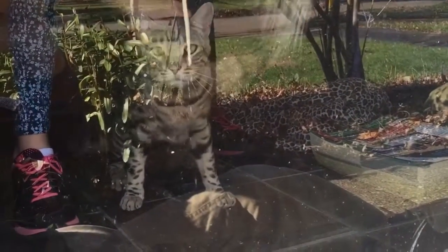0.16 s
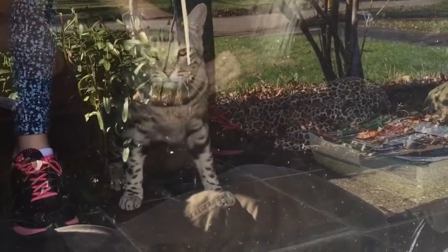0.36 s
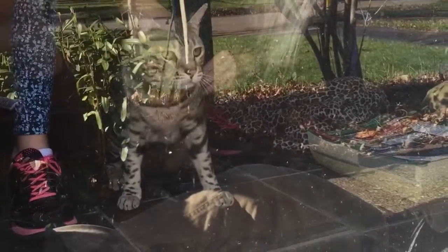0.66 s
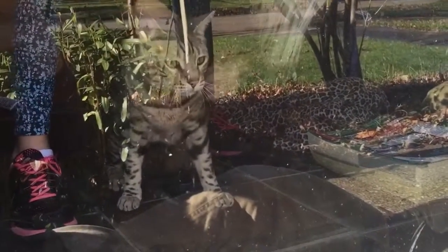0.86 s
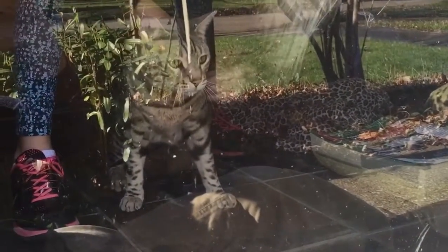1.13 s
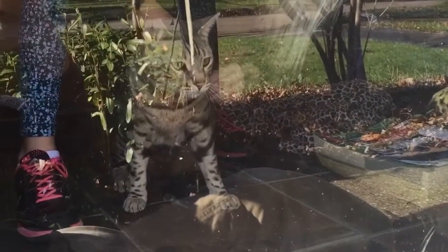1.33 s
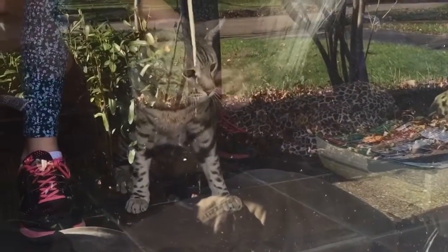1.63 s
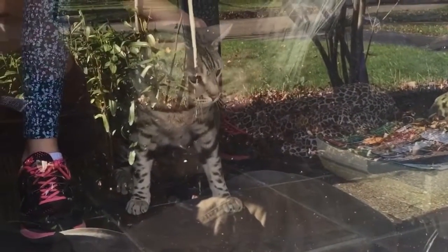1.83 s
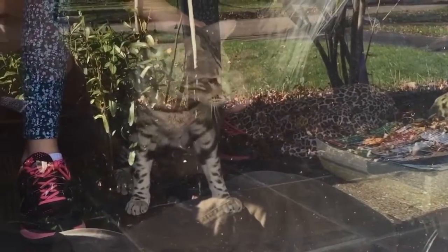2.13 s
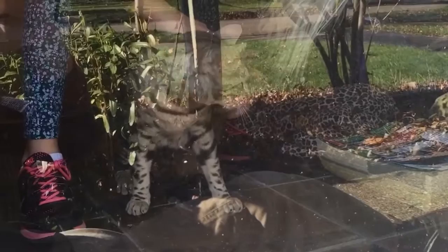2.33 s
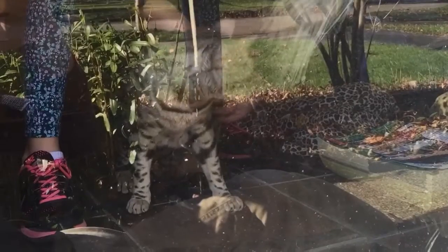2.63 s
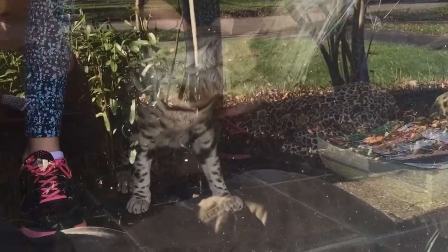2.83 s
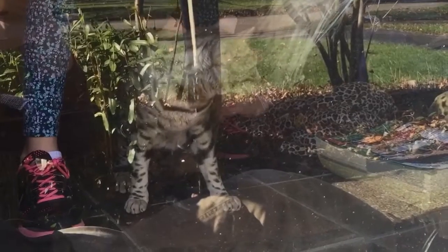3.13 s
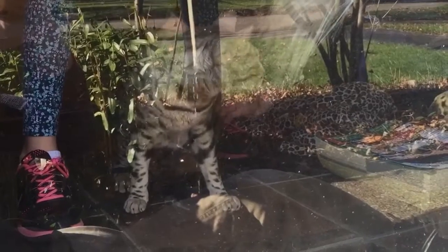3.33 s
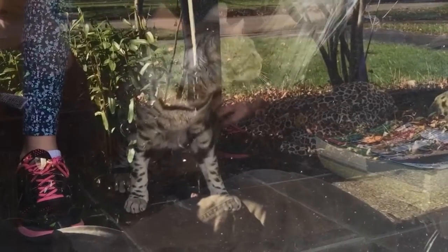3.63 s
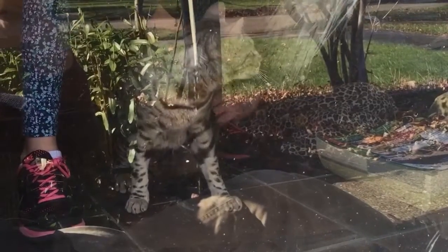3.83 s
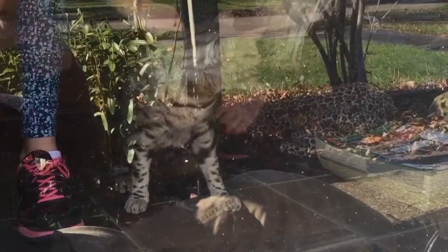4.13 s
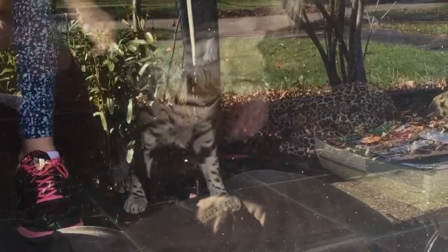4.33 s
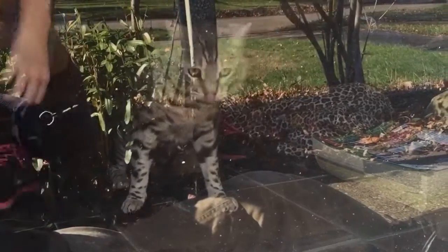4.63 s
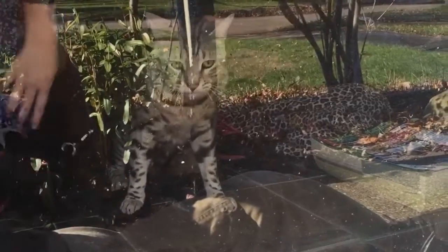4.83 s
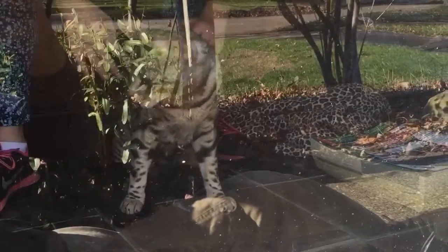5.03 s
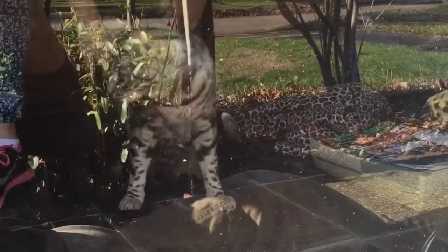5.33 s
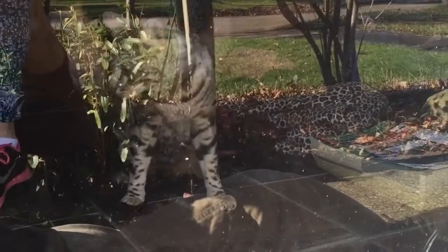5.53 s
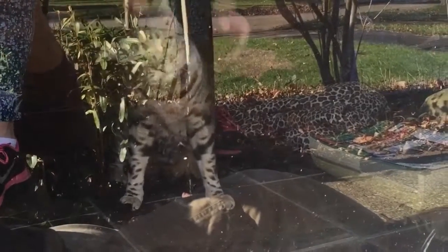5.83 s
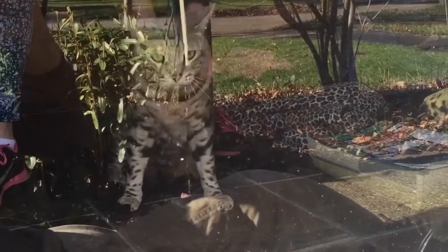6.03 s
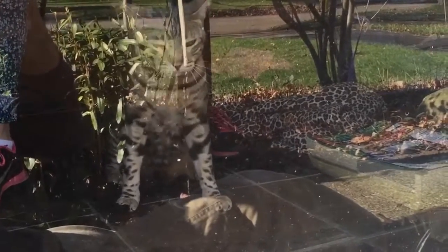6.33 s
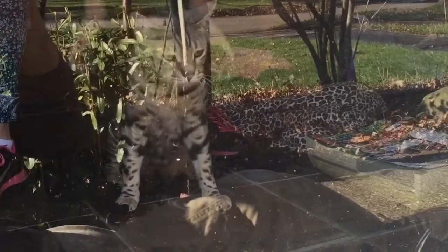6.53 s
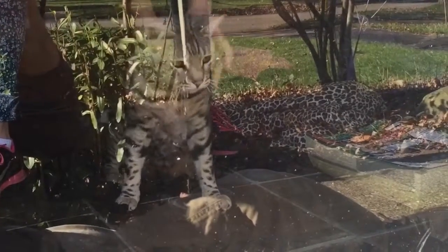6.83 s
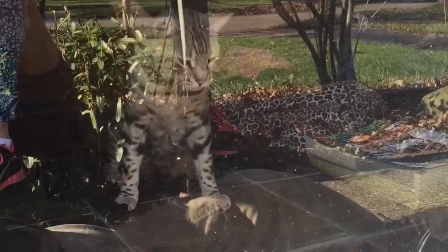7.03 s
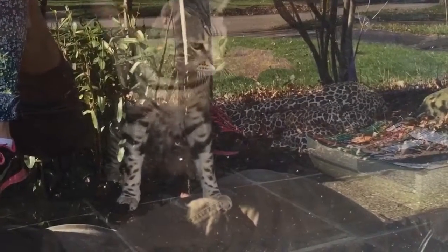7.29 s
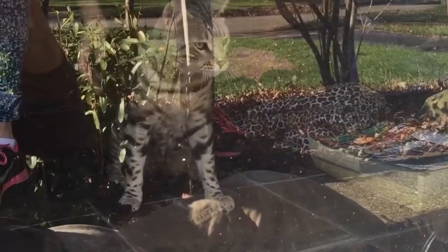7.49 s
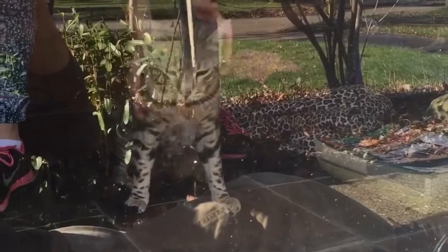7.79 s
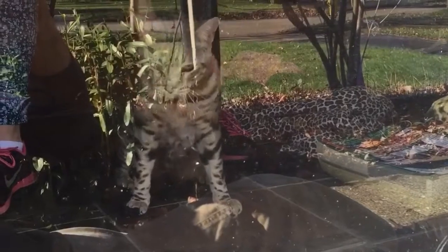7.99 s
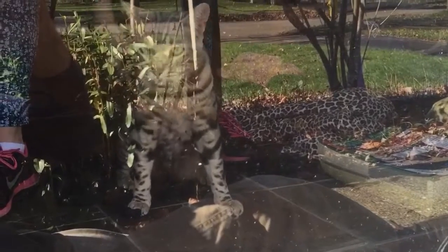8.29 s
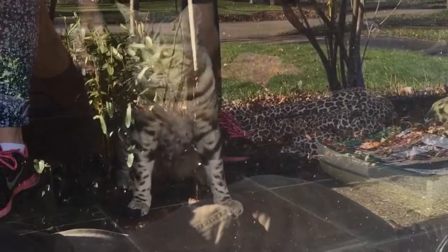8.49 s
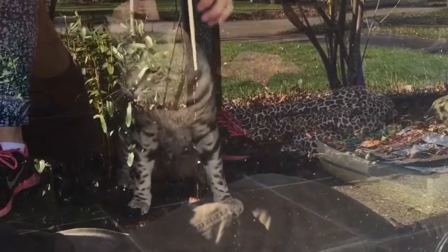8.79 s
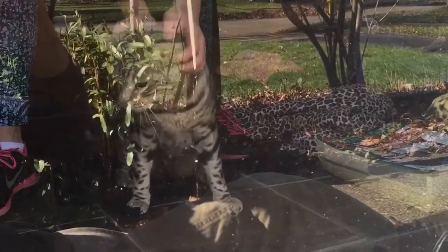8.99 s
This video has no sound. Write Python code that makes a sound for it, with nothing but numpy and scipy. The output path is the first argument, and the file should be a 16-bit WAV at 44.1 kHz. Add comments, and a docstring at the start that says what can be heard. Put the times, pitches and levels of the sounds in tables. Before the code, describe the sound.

A small engine drones in the distance under chattering songbirds, then a door latch clicks, thumps and rattles in a metal frame before calm returns.

```python
"""One microphone at a sliding glass door, facing a garden. From the start a small engine drones some way off,
as tones at multiples of its cycle rate; songbirds chatter in gliding whistles over a faint wash of shaped noise.
After about 3 s come soft rustles of grainy noise close by, then light ticks of the latch at 4.4 s. From 5.5 s
dull noise thumps push the door panel and the latch clacks and rattles, noise bursts ringing the metal frame.
A little more rustling follows, while engine and birds go on."""
import sys
import numpy as np
from scipy import signal
from scipy.fft import rfft, irfft, next_fast_len
from scipy.io import wavfile

SR = 44100
rng = np.random.default_rng(int(sys.argv[2]) if len(sys.argv) > 2 else 0)


def transcribe(signal):
    """Save signal, clipped to [-1, 1], as a 16-bit WAV file at the path in sys.argv[1]."""
    frames = np.atleast_2d(signal).T
    limited = np.clip(frames, -1, 1)
    pcm = np.round(limited * 32767).astype(np.int16)
    wavfile.write(sys.argv[1], SR, pcm)


N = 403515
T = np.arange(N) / SR  # time axis, s


def amp(db):
    """Decibels to gain."""
    return 10 ** (np.asarray(db) / 20)


def unit(x):
    """Scale to rms 1."""
    return x / np.sqrt(np.mean(x ** 2) + 1e-20)


def curves(table):
    """Each column of a table, joined by straight lines in time."""
    s, *columns = np.transpose(table)
    return [np.interp(T, s, column) for column in columns]


def add(out, s, x):
    """Mix x into out from time s on."""
    i = max(int(s * SR), 0)
    out[i:i + len(x)] += x[:max(N - i, 0)]


def colour(x, points):
    """Shape a sound with a (Hz, dB) spectrum that falls away beyond its end points."""
    hz, db = np.transpose(points)
    size = next_fast_len(len(x))
    f = np.fft.rfftfreq(size, 1 / SR) + 1  # 1 Hz up, to keep the logarithm finite
    gain = amp(np.interp(np.log(f), np.log(hz), db))
    gain = gain * np.minimum(f / hz[0], 1) ** 2 * np.minimum(hz[-1] / f, 1) ** 2
    return irfft(rfft(x, size) * gain, size)[:len(x)]


def noise(points, size=N):
    """Noise of a given spectrum, rms 1."""
    return unit(colour(rng.standard_normal(size), points))


def band(x, lo_hz, hi_hz):
    """Band-pass."""
    sos = signal.butter(2, [lo_hz, min(hi_hz, SR / 2 - 1)], "band", fs=SR, output="sos")
    return signal.sosfilt(sos, x)


def walk(rate, size=N):
    """Random values of spread about 1, drawn rate times a second and joined by straight lines."""
    at = np.arange(size) * rate / SR
    count = int(at[-1]) + 2
    # the root makes up for the spread lost between the points
    return np.interp(at, np.arange(count), rng.standard_normal(count)) * np.sqrt(3 / 2)


def fade(t, t60):
    """Exponential decay that loses 60 dB in t60 seconds."""
    return np.exp(-np.log(1000) * t / t60)


def echoes(x, t60, wet_db, top_hz):
    """Diffuse reflections of walls and paving: a decaying noise tail added to the direct sound."""
    t = T[:SR]
    tail = band(rng.standard_normal(SR), 160, top_hz) * fade(t, t60) * (1 - np.exp(-t / 0.001))
    return x + amp(wet_db) * signal.fftconvolve(x, tail / np.sqrt(np.sum(tail ** 2)))[:N]


def doorway(x, ripple_db=-15):
    """Close reflections between glass, floor and wall put a fixed ripple on the spectrum."""
    t = T[:SR // 20]
    early = band(rng.standard_normal(len(t)), 620, 6100) * fade(t, 0.034) * (t > .002)
    return x + amp(ripple_db) * signal.fftconvolve(x, early / np.sqrt(np.sum(early ** 2)))[:N]


# spectra of the low rumble, road drone, tyres and thin hiss: [freq_hz, relative density_db per Hz]
RUMBLE_SPECTRUM = [(20, -16.5), (35, -19.5), (48, -1), (70, 3.5), (110, 1), (170, -3), (260, -15),
                   (400, -25), (800, -44)]
DRONE_SPECTRUM = [(240, -3), (350, 2), (480, -5.5), (620, -7), (900, -12.5)]
TYRE_SPECTRUM = [(400, -9.5), (620, -6.5), (780, -1.5), (980, 3.5), (1130, 3), (1330, 2.5), (1550, -0.5),
                 (1950, -2.5), (2400, -6), (3500, -15), (5000, -25), (7500, -33)]
HISS_SPECTRUM = [(2000, 10.5), (4000, 3.5), (6200, 5.5), (7500, -1.5), (9500, -2), (10400, -8), (11500, -5),
                 (15000, -8)]
# low outdoor rumble: [time_s, level_db]
RUMBLE_LEVEL = [(0, -45.5), (.8, -44.5), (1.7, -47.5), (2.05, -44), (2.7, -46), (5.2, -45.5), (6.3, -48),
                (7.1, -45), (9.15, -45.5)]
# far road, before a small lift of both: [time_s, drone_db, tyres_db]
ROAD_LEVEL = [(0.0, -62.5, -57.5), (2.06, -59.5, -58), (3.74, -63.5, -60), (6.04, -62, -61.5),
              (6.52, -64, -61), (9.15, -62.5, -58)]


def outdoors():
    """Low rumble, the drone and tyres of a far road and a thin steady hiss, all shaped noise."""
    (rumble_db,) = curves(RUMBLE_LEVEL)
    drone_db, tyres_db = curves(ROAD_LEVEL)
    rumble = noise(RUMBLE_SPECTRUM) * amp(rumble_db + 1.36 * walk(9))
    drone = noise(DRONE_SPECTRUM) * amp(drone_db + 2.0 + 1.6 * walk(14))
    tyres = noise(TYRE_SPECTRUM) * amp(tyres_db + 0.62 + 1.2 * walk(11))
    hiss = amp(-74.5) * noise(HISS_SPECTRUM)
    return rumble + drone + doorway(tyres + hiss)


# orders are multiples of the cycle rate; levels are rms
# engine some way off: [time_s, cycle_rate_hz, firing_tone_db (order 4), throb_db (reference for its neighbours)]
ENGINE = [(0.0, 24.4, -38.5, -46), (0.74, 24.83, -37.5, -43), (0.89, 24.05, -37, -42),
          (1.07, 24.87, -39.5, -44), (1.53, 24.5, -43, -48), (1.63, 24.56, -62, -67),
          (2.11, 25.03, -44, -47), (3.08, 25.75, -39, -46), (4.13, 25.19, -39, -50.5),
          (4.28, 25.14, -41.5, -73), (4.94, 24.78, -39, -52), (6.45, 24.48, -40, -54.5),
          (7.77, 24.78, -42, -43), (8.95, 25.37, -58, -49.5), (9.15, 24.71, -51, -46)]
# first and second overtones of the firing tone, orders 8 and 12: [time_s, level_db]
OCTAVE_LEVEL = [(0.0, -81), (0.07, -57), (1.12, -47), (1.22, -60.5), (1.4, -44.5), (1.81, -57.5),
                (2.6, -46), (2.73, -61.5), (4.05, -47.5), (4.89, -55), (5.99, -53), (6.04, -64),
                (7.01, -57), (7.16, -80), (7.34, -51), (7.98, -62.5), (8.23, -50.5), (9.15, -64)]
TWELFTH_LEVEL = [(0.0, -59.5), (0.25, -65), (0.36, -56.5), (0.92, -62.5), (2.01, -55), (2.73, -76),
                 (3.9, -71), (4.08, -58), (7.24, -61.5), (9.15, -76)]
# lines that rise and fall with the throb: [order, level_db re throb_db]
THROB_ORDERS = [(3, -13), (5, -0.5), (6, -13)]
# weak lines of steady mean level: [order, level_db]
SIDE_ORDERS = [(6, -61.5), (7, -78.5), (9, -64.5), (10, -72.5), (13, -77), (16, -72.5), (20, -75.5)]


def engine():
    """Four unequal firings a cycle: a strong firing tone with neighbours that make it throb at the cycle rate."""
    cycle_hz, firing_db, throb_db = curves(ENGINE)
    (octave_db,), (twelfth_db,) = curves(OCTAVE_LEVEL), curves(TWELFTH_LEVEL)
    unsteady_hz = cycle_hz * (1 + 0.00354 * walk(14))
    angle = 2 * np.pi * np.cumsum(unsteady_hz) / SR
    lines = [(4, firing_db), (8, octave_db), (12, twelfth_db)]
    lines += [(order, throb_db + db) for order, db in THROB_ORDERS]
    lines += [(order, db + 1.4 * walk(3)) for order, db in SIDE_ORDERS]
    out = np.zeros(N)
    for order, db in lines:
        # the air on the way makes each line waver a little in level and phase
        out += amp(db + 0.8 * walk(12)) * np.cos(order * angle + 0.3 * walk(5))
    return np.sqrt(2) * out


RASP_OCT, RASP_HZ = 0.0993, 602  # pitch flutter of a fully raspy note, and its changes a second
BROKEN_DB, BROKEN_RATE = 3, 155  # unevenness of a note's loudness, and its changes a second
PARTNER_OCT, PARTNER_DB = .16, -14  # a fainter partner tone a little above each note: its pitch offset in octaves and level


def whistle(length, mid_hz, glide_oct, db, swing_oct=0, swings=1, rasp=0.678):
    """One gliding, warbling note with a fainter partner tone a little above it; rasp makes the pitch flutter,
    and each tone breaks up on its own."""
    size = int(max(length, .01) * SR)
    along = np.linspace(-1, 1, size)
    glide = glide_oct / 2 * along
    swing = swing_oct * np.cos(np.pi * swings * along)
    flutter = RASP_OCT * rasp * walk(RASP_HZ, size)
    angle = 2 * np.pi * np.cumsum(mid_hz * 2 ** (glide + swing + flutter)) / SR

    def voice(ratio):
        """One tone of the note, with its own uneven loudness."""
        return unit(amp(BROKEN_DB * walk(BROKEN_RATE, size))) * np.sin(ratio * angle)

    both = voice(1) + amp(PARTNER_DB) * voice(2 ** PARTNER_OCT)
    return amp(db) * signal.windows.tukey(size, .4) * both


TWITTER_HZ, TWITTER_SPREAD_OCT = 3635, 0.42  # centre pitch of the flock, and spread to either side
TWITTER_S = .06  # mean length of a note, s
TWITTER_GLIDE_OCT, TWITTER_GLIDE_SPREAD_OCT = -0.202, 0.219
TWITTER_DB_PER_OCT, TWITTER_SCATTER_DB = -14, 1  # high notes are weaker; every note has its own strength


def twitter(s, within_s, db, count):
    """Short faint notes of other birds, scattered round time s."""
    out = np.zeros(N)
    for late, pitch, long, glide, loud in rng.uniform(-1, 1, (count, 5)):
        octaves = TWITTER_SPREAD_OCT * pitch
        length = TWITTER_S * (1 + long / 2)
        glide_oct = TWITTER_GLIDE_OCT + TWITTER_GLIDE_SPREAD_OCT * glide
        note_db = db + TWITTER_DB_PER_OCT * octaves + TWITTER_SCATTER_DB * loud
        note = whistle(length, TWITTER_HZ * 2 ** octaves, glide_oct, note_db)
        add(out, s + within_s * late - length / 2, note)
    return out


STRAY_DB = -70.5  # flock notes at any time, at the centre pitch
ANSWER_DB, ANSWER_WITHIN_S = -70, .08  # flock notes that crowd round a clear one
# clear bird notes, most of them falling; the swing is a crest (+) or dip (-) in mid-note:
# [start_s, length_s, middle_pitch_hz, glide_octaves, swing_octaves, swing_count, rasp (0-1), level_db]
NOTES = [(0, .099, 3860, -.22, .02, 1, .1, -70), (.6, .08, 3600, -1, -0.037, 1, .2, -59.5),
         (.742, 0.029, 3450, 0.21, 0, 1, 0.45, -56.5), (0.955, .029, 4330, 0.011, .02, 1, 0.24, -64),
         (1.168, .09, 3490, .3, 0.012, 1, 0.18, -54.5), (1.238, 0.033, 3600, -.35, 0, 1, .2, -59.5),
         (1.385, 0.031, 3340, 0, .06, 1, .15, -56), (1.652, 0.044, 5600, -.2, 0, 1, .6, -67.5),
         (1.713, 0.048, 4200, -.3, .02, 1, 0.73, -58.5), (1.939, .03, 4400, -.05, 0, 1, .5, -63.5),
         (2.169, 0.041, 5444, .08, 0, 1, 0.23, -63), (2.326, .033, 4150, -0.2, 0, 1, .3, -66),
         (2.67, .12, 4520, -.08, .02, 2.5, 0.1, -65), (2.701, 0.099, 3460, -0.0057, .09, 2.3, 0.2, -55),
         (2.791, .029, 2750, .2, 0, 1, .4, -54), (2.82, .1, 3490, 0.054, .08, 1, .7, -58.5),
         (2.958, 0.041, 3760, -.34, .05, 1, 0.35, -63), (3.04, 0.029, 3200, -.1, .04, 1, 0.26, -59),
         (3.115, 0.089, 3230, 0.061, -.056, 1.3, 0.2, -53), (3.39, .03, 2903, -0.46, 0, 1, .7, -63),
         (3.484, 0.073, 5050, -0.37, 0.0062, 1, .3, -69), (3.66, .13, 3260, -.31, .06, 3, 0.63, -57.5),
         (3.79, .037, 5500, 0.12, 0, 1, .9, -65), (3.998, .06, 3352, -.55, 0.013, 1, .26, -59),
         (4.025, .075, 5080, -0.12, 0.0038, 1, 0.24, -65), (4.088, .066, 4100, -0.92, .05, 1, .25, -54.5),
         (4.239, 0.083, 3314, 0.017, -.06, 1.4, 0.17, -57), (4.249, 0.022, 5670, 0.19, 0, 1, .2, -61),
         (4.31, .053, 3200, -.1, .05, 2, .3, -62), (4.312, 0.03, 5600, 0.044, 0, 1, .4, -65),
         (4.535, .047, 2690, -.26, .06, 2, .7, -61), (4.575, 0.033, 4380, -.05, .02, 1, .2, -62),
         (4.61, 0.071, 3480, 0, -.07, 1, 0.3, -57), (4.673, .025, 2840, -0.25, 0, 1, 0.27, -57),
         (4.783, .07, 4000, -0.41, -0.016, 2, .35, -57), (4.848, 0.038, 6450, 0, 0.036, 2, .4, -61.5),
         (4.858, 0.039, 3080, -.08, 0.037, 1, 0.34, -54), (4.937, .028, 3750, -.35, 0, 1, .4, -59),
         (4.969, 0.047, 4170, 0, -.02, 1, .4, -58), (5.005, 0.043, 2980, -.45, 0, 1, 0.63, -54.5),
         (5.09, .065, 3310, -0.25, 0.0036, 1, .7, -61.5), (5.59, .039, 4650, -0.16, 0.0057, 1, .37, -62.5),
         (5.634, .055, 3550, -.2, 0.019, 1, 0.35, -59.5), (5.8, 0.033, 5300, .25, 0, 1, .3, -63),
         (6.083, 0.085, 6350, .06, .01, 2, .25, -66.5), (6.11, 0.073, 3270, -.03, 0.023, 2, 0, -63),
         (6.177, .069, 4565, -.5, -.017, 1, 0.42, -63), (6.249, 0.046, 4100, -0.25, 0, 1, .6, -59.5),
         (6.55, 0.094, 3250, 0.56, -0.025, 1, 0.56, -58), (6.78, .035, 4050, 0.11, 0, 1, .2, -64),
         (6.8, 0.048, 3200, 0, -.02, 1, .2, -65), (6.975, .085, 3300, -0.61, -.02, 2, 0.38, -64),
         (7.041, 0.028, 5500, -0.092, 0, 1, .2, -70), (7.265, 0.048, 4445, -0.091, .035, 1, .15, -56.5),
         (7.4, 0.089, 3646, -.5, -.055, 2, .8, -61.5), (7.495, .11, 3777, -0.75, .03, 3, 0.35, -60.5),
         (7.631, 0.029, 2520, -0.19, 0, 1, .3, -62), (7.657, 0.024, 3980, -.25, 0, 1, .3, -62),
         (7.775, 0.054, 3853, -0.022, -0.015, 1, 0.23, -56.5), (7.822, .05, 5500, .03, 0, 1, .3, -66.5),
         (7.845, 0.057, 3250, -0.78, -.06, 1, 0.5, -57), (7.914, .05, 3000, -.05, 0.034, 1, 0.1, -51.5),
         (8.175, .03, 4550, -.1, 0.038, 1, .3, -68), (8.327, 0.094, 3900, 0.06, 0.078, 1, .5, -63),
         (8.41, .045, 3220, -0.43, .02, 1, .45, -53), (8.555, .07, 4150, -.45, 0, 1, .3, -66.5),
         (8.66, 0.099, 2880, .03, 0.051, 1, .12, -55.5), (8.713, .12, 3990, -.3, .06, 3, .5, -64),
         (9.098, .025, 4650, -.1, 0, 1, 0.29, -65), (9.104, .05, 3100, 0.087, 0, 1, 0.2, -61)]


def birds():
    """Clear notes with flock notes crowding round each, and stray calls, blurred by the garden's reflections."""
    out = twitter(T[-1] / 2, T[-1] / 2, STRAY_DB, count=130)
    for s, length, hz, glide_oct, swing_oct, swings, rasp, db in NOTES:
        add(out, s, whistle(length, hz, glide_oct, db, swing_oct, swings, rasp))
        out += twitter(s + length / 2, ANSWER_WITHIN_S, ANSWER_DB, count=2)
    return echoes(out, t60=.2, wet_db=-10, top_hz=9000)


RUSTLE_GRAIN_DB, RUSTLE_GRAIN_RATE = 2.5, 300  # unevenness, and its changes a second
# soft rustles nearby, levels before the swell: [start_s, length_s, level_db, airy_top_db]
RUSTLES = [(2.733, 0.16, -67, -90), (3.117, .23, -65.5, -90), (4.385, .05, -69, -90),
           (4.501, .085, -62.5, -89), (4.75, 0.4, -66, -92), (6.588, 0.2, -67.5, -81),
           (6.79, 0.12, -67, -81), (8.691, 0.16, -66, -92)]
# their spectrum below the airy top: [freq_hz, relative density_db per Hz]
RUSTLE_SPECTRUM = [(1200, -14), (2400, 7.5), (3200, 6.5), (4500, -0.5), (6000, -5), (8000, -22.5),
                   (14000, -31)]


def rustles():
    """Brief brushes, each a swell of tiny dense grains with an airy top."""
    out = np.zeros(N)
    for s, length, db, air_db in RUSTLES:
        size = int(max(length, .01) * SR)
        air = unit(band(rng.standard_normal(size), 5000, 13000))
        brush = amp(db) * noise(RUSTLE_SPECTRUM, size) + amp(air_db) * air
        grains = unit(amp(RUSTLE_GRAIN_DB * walk(RUSTLE_GRAIN_RATE, size)))
        add(out, s, brush * grains * signal.windows.tukey(size, .5))
    return doorway(out)


# dull pushes on the door panel, levels before the decay: [start_s, level_db]
BUMPS = [(5.482, -37), (5.682, -41.5), (5.721, -49), (5.855, -44.5)]
# their spectrum: [freq_hz, relative density_db per Hz]
THUD_SPECTRUM = [(160, -2), (230, 0), (340, -3), (470, -5), (600, -11), (800, -26)]


def bump():
    """Dull, well-damped pushes against the door panel: low noise with a soft attack and a short decay."""
    out, t = np.zeros(N), T[:SR // 3]
    attack = 1 - np.exp(-t / .005)
    for s, db in BUMPS:
        add(out, s, amp(db) * noise(THUD_SPECTRUM, len(t)) * fade(t, t60=.14) * attack)
    return out


def modes(table, t, body_db=0):
    """Damped tones; the contact point shifts from blow to blow, and with it the strength and pitch of each."""
    out = 0
    for (hz, db, t60), (strength, detune, phase) in zip(table, rng.standard_normal((len(table), 3))):
        weight_db = db + 1.5 * strength + body_db * (hz < 1800)
        cycles = hz * (1 + 0.0039 * detune) * t + phase
        out = out + amp(weight_db) * fade(t, t60) * np.sin(2 * np.pi * cycles)
    return out


# loose parts of the latch buzzing out after a blow: dB re the crack, unevenness dB, grains a second
BUZZ_DB, BUZZ_GRAIN_DB, BUZZ_RATE = -17.5, 6, 650
# contact noise of the latch: [freq_hz, relative density_db per Hz]
CONTACT_SPECTRUM = [(300, 6), (560, 1.5), (740, -4), (1050, 10.5), (1900, -0.5), (2700, 4), (4000, 2),
                    (4800, -8), (5800, -3.5), (7000, -18), (10000, -28), (12000, -26), (15000, -39)]
# clack of the struck part: [multiple of its pitch, relative level_db, t60_s]
CATCH_MODES = [(.68, -6, 0.013), (1, 0, .02)]
# ring of the metal door frame: [freq_hz, relative level_db, t60_s]
FRAME_MODES = [(456, 0, .2), (932, 0.5, .21), (1124, 7, .17), (1230, 5, .16), (1440, -3, .21),
               (2310, -2, 0.23), (2505, -4, .18), (2816, -4, .18), (3350, -5, 0.15), (3670, -8, .14),
               (5200, -7, .12), (5760, -11, .16)]


def blow(db, treble_db, clack_hz, clack_db, body_db):
    """A crack of contact noise with a grainy buzz, a bright tick, the struck part's clack and the frame's ring."""
    t = T[:SR // 4]
    grains = unit(amp(BUZZ_GRAIN_DB * walk(BUZZ_RATE, len(t))))
    crack_shape = fade(t, t60=.023) + amp(BUZZ_DB) * grains * fade(t, t60=0.28)
    crack = noise(CONTACT_SPECTRUM, len(t)) * crack_shape
    tick_shape = fade(t, t60=0.015) + amp(-18.5) * grains * fade(t, t60=.14)
    tick = unit(band(rng.standard_normal(len(t)), 5200, 14000)) * tick_shape
    clack = modes([(multiple * clack_hz, mode_db, t60) for multiple, mode_db, t60 in CATCH_MODES], t)
    ring = modes(FRAME_MODES, t, body_db)
    mix = amp(-2.5) * crack + amp(treble_db + 2.5) * tick + amp(clack_db) * clack + amp(-20.5) * ring
    attack = 1 - np.exp(-t / .0007)
    return amp(db) * attack * mix


# softer blows ring the low modes of the frame more: their dB at a blow of 0 dB, and dB per dB of the blow
BODY_DB, BODY_SLOPE = -23, -0.55
# latch clacks and ticks, treble and clack relative to the blow, treble before a fixed lift:
# [start_s, blow_level_db, treble_db, clack_pitch_hz, clack_db]
CLACKS = [(4.382, -42.5, -23, 1200, -10), (4.466, -51, -17, 4000, -5), (4.526, -44, -29, 5398, -11),
          (5.483, -50.5, -32, 2700, -8), (5.681, -37, -17, 2551, -4), (5.72, -29.5, -17.5, 3930, 1),
          (5.743, -37.5, -25, 3040, -1), (5.83, -41, -25, 3970, 0), (5.853, -37, -15, 4150, -3),
          (5.865, -34.5, -17, 2830, -0.5), (5.871, -36, -30, 2810, 0), (5.891, -39.5, -32, 2100, -3),
          (5.96, -42, -28, 2660, -5), (5.966, -44.5, -33, 3897, -9)]


def latch(count=3):
    """Every blow is followed by a few weaker bounces of the loose latch."""
    out = np.zeros(N)
    for s, db, treble_db, clack_hz, clack_db in CLACKS:
        body_db = BODY_DB + BODY_SLOPE * db
        add(out, s, blow(db, treble_db, clack_hz, clack_db, body_db))
        # the latch has little play, so even a hard blow gives only small bounces
        bounce_db = min(db - 16, -47)
        for k, gap in enumerate(np.cumsum(rng.uniform(.003, .016, count))):
            add(out, s + gap, blow(bounce_db - 2 * k, treble_db, clack_hz, clack_db, body_db))
    return echoes(out, t60=0.39, wet_db=-12, top_hz=6500)


def scene():
    """All sources at one microphone."""
    return (outdoors() + engine() + birds() + rustles() + bump() + latch())[None]


def record(dry):
    """The recorder eases in over 4 ms without a click and cuts the top steeply."""
    ease = np.minimum(T / .004, 1)
    top_cut = signal.ellip(10, .2, 80, 15260, fs=SR, output="sos")  # low-pass, edge in Hz
    return signal.sosfilt(top_cut, dry * ease)


dry = scene()
out = record(dry)
transcribe(out)
```